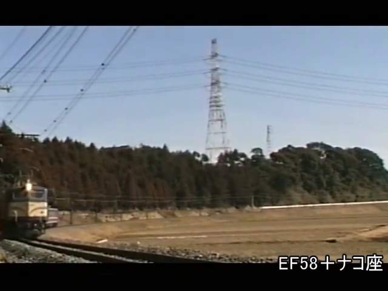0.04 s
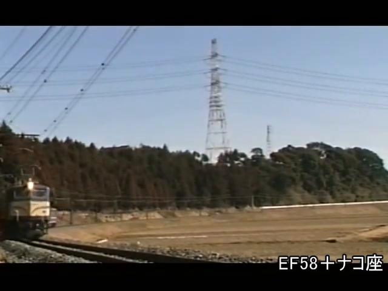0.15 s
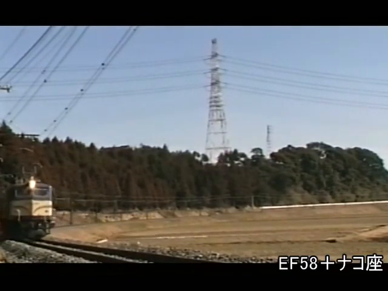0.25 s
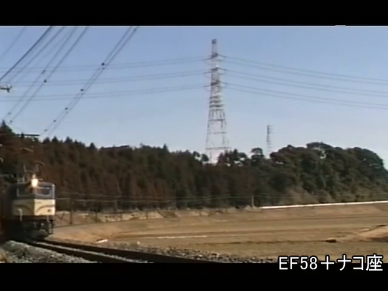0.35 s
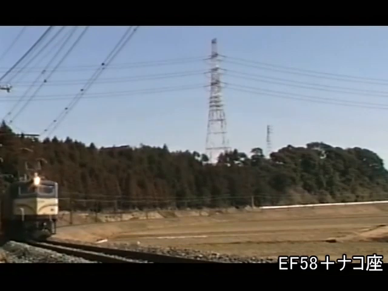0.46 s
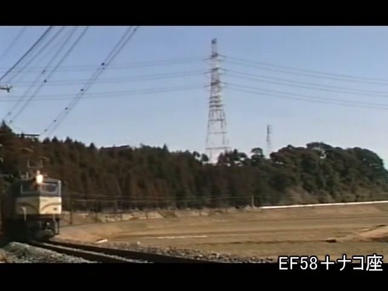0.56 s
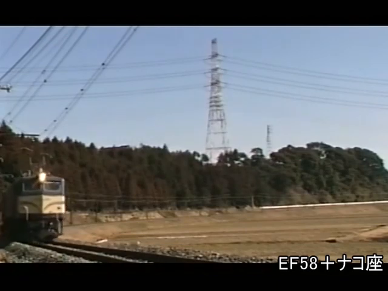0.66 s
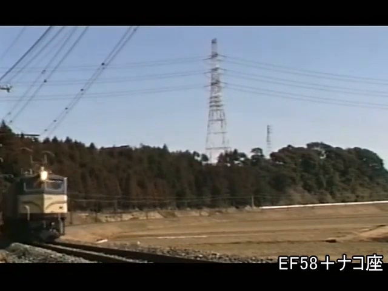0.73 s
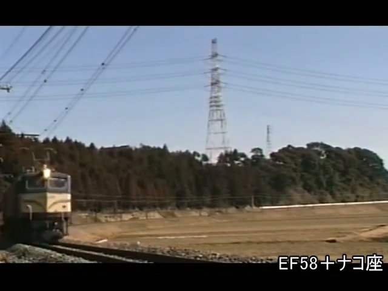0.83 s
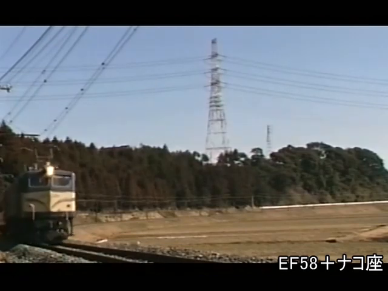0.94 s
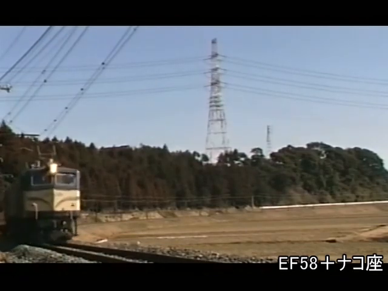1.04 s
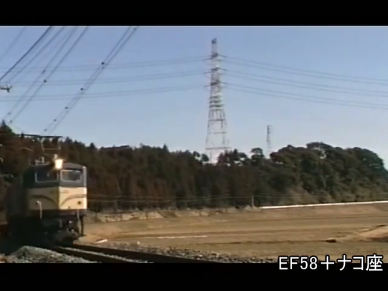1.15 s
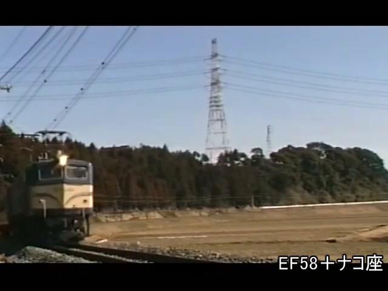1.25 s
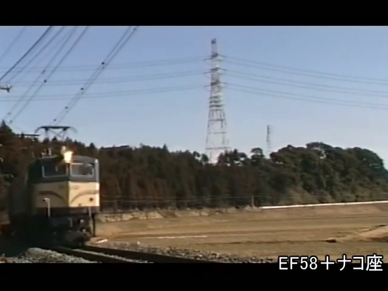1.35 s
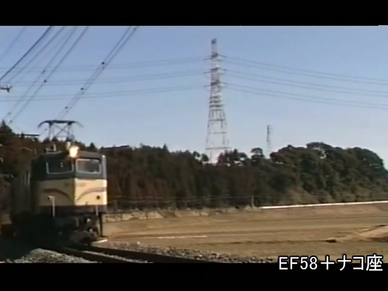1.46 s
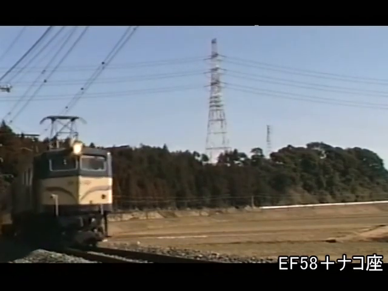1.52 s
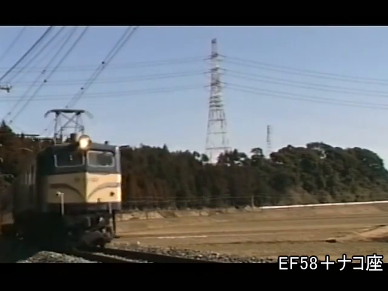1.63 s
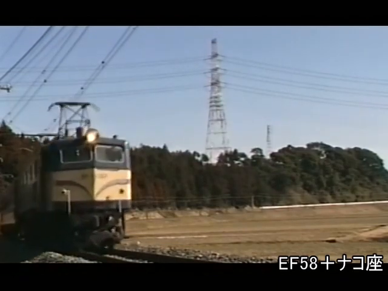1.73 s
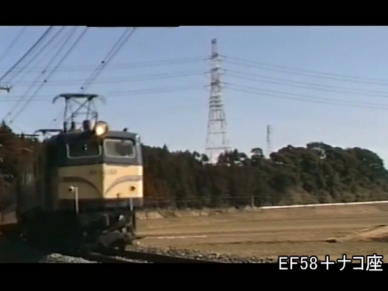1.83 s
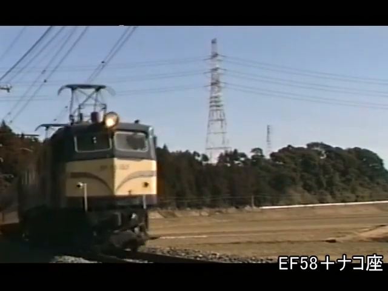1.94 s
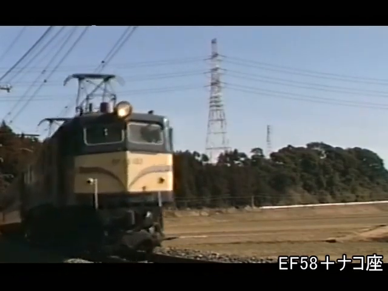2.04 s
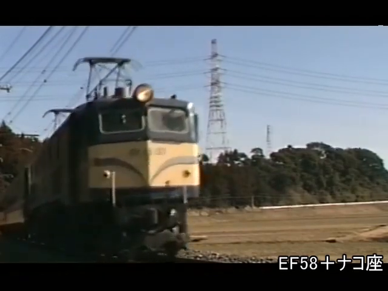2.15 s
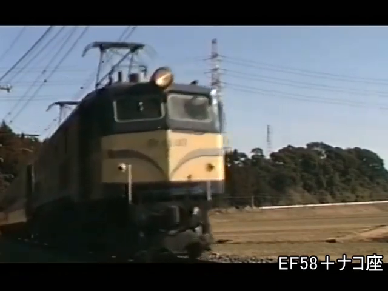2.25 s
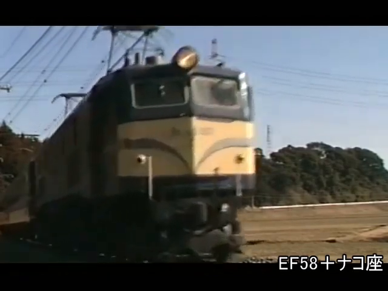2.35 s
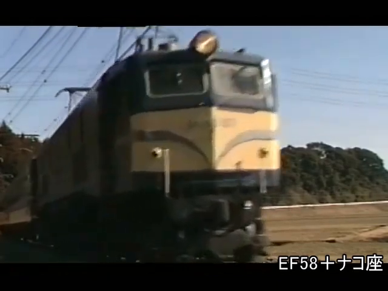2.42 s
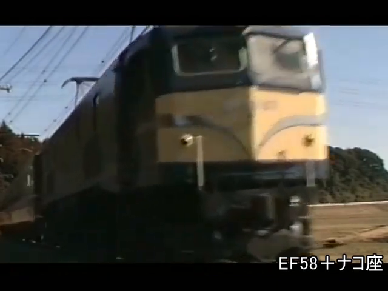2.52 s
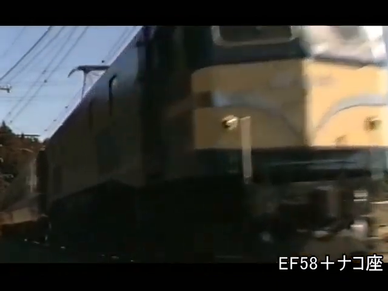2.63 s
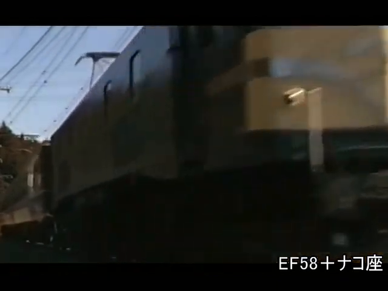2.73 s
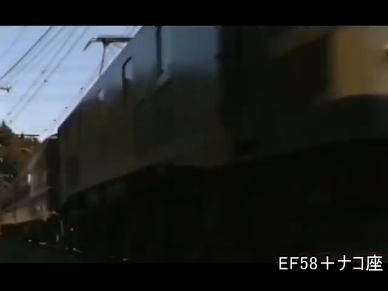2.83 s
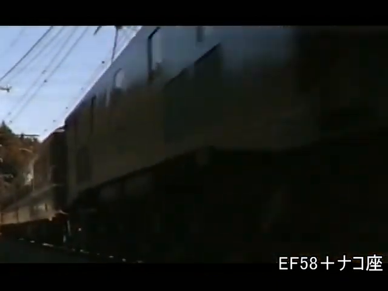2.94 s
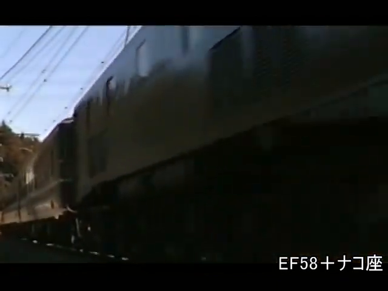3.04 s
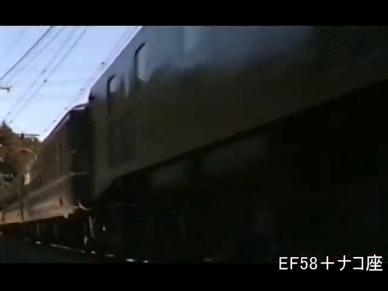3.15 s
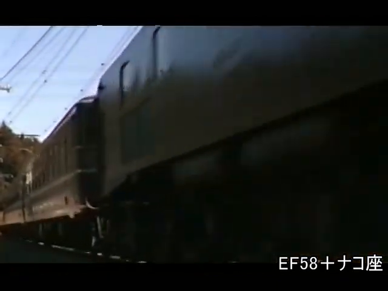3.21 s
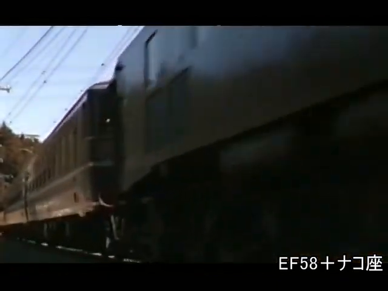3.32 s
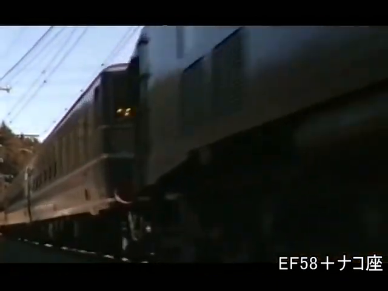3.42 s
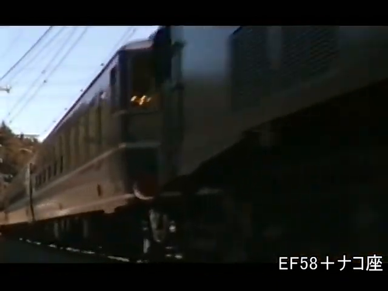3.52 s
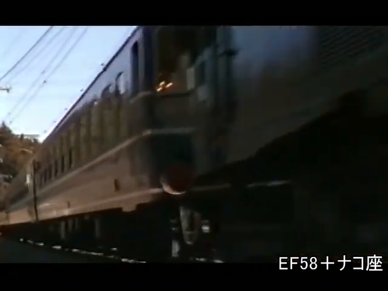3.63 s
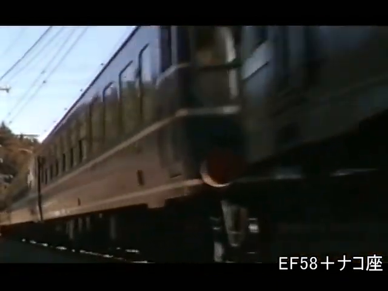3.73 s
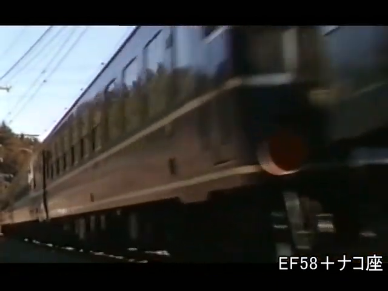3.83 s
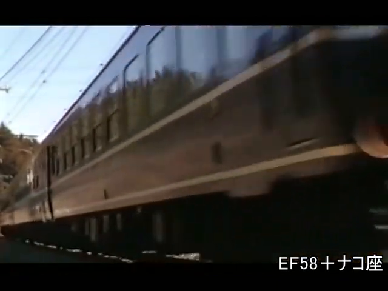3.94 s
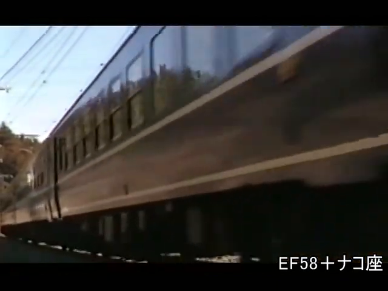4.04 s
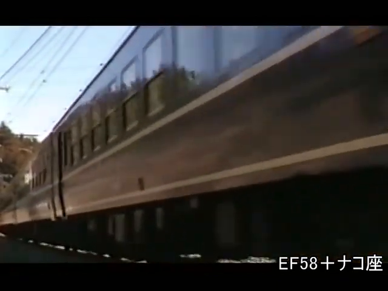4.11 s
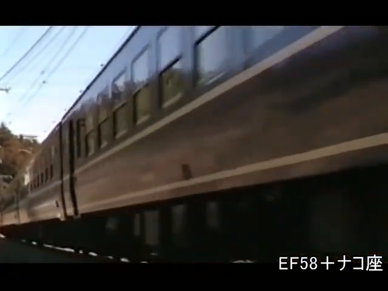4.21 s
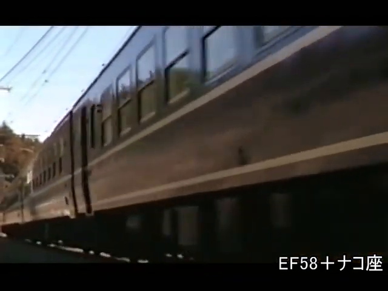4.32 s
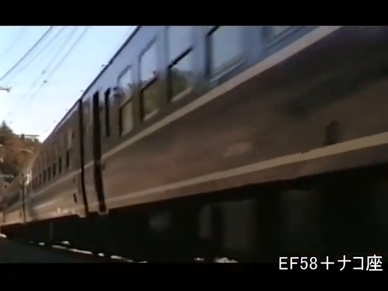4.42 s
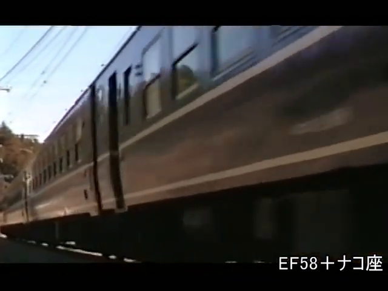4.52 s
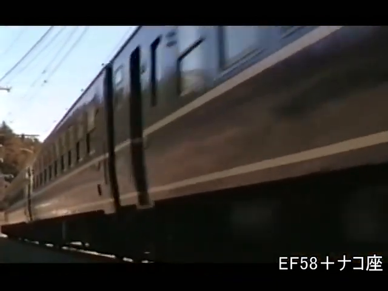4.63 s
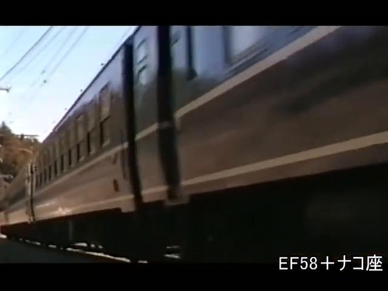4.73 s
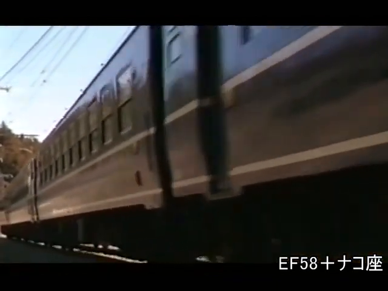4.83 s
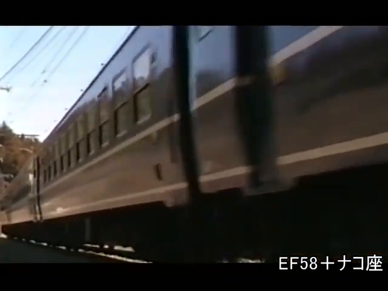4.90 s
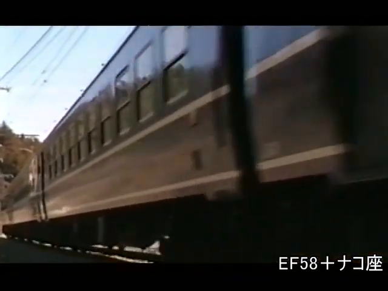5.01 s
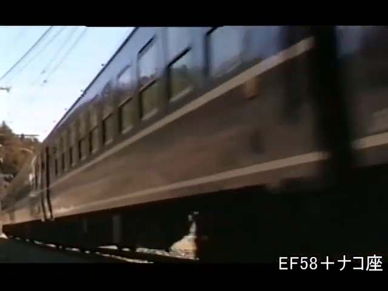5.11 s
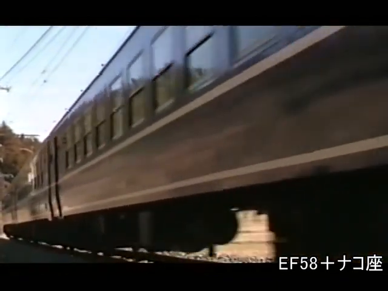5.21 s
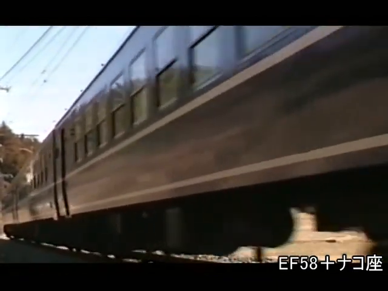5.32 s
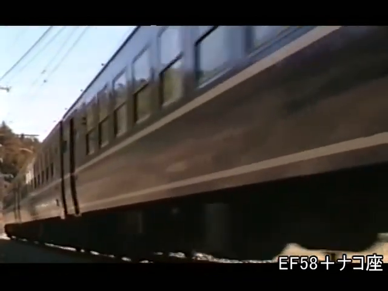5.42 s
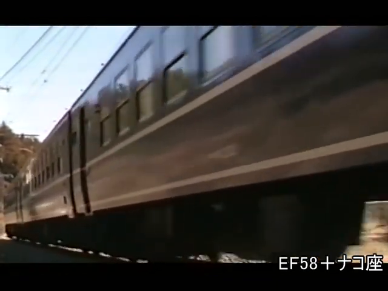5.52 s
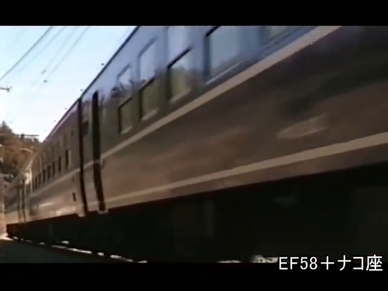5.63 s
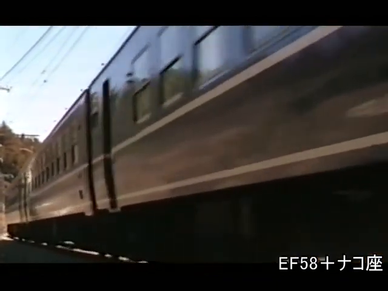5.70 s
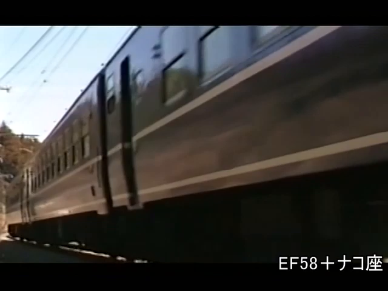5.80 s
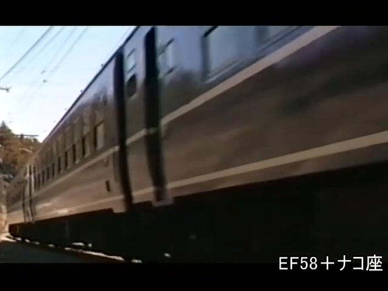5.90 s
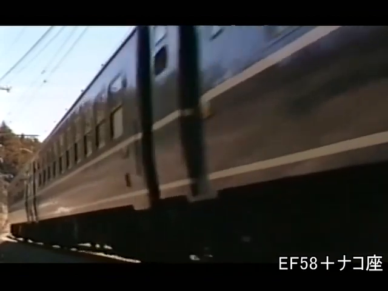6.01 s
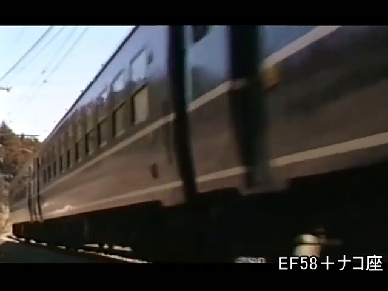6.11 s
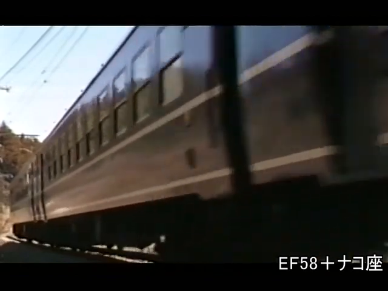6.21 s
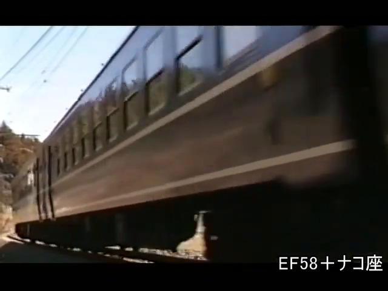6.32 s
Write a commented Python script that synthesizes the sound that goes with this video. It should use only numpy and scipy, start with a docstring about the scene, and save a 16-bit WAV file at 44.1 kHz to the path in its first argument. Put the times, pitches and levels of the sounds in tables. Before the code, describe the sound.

An electric locomotive and coaches approach through gusty wind and roar close past, wheels clacking over rail joints.

```python
"""An electric locomotive and its coaches pass a stereo microphone beside jointed track in open country.
First, gusts buffet the two ports while the train nears behind trees. Rough wheels shake sleepers, rail
and wheel discs; each axle knocks at the joints, and some blows run along the rail as a short ring.
From 2.3 s the train's draught joins the wind. Gears and blowers roar loudest near 3.3 s, then are
screened. The coaches follow: their discs sing, loose parts clatter, wheels squeal briefly."""
import sys
import numpy as np
from scipy import signal
from scipy.fft import rfft, irfft, next_fast_len
from scipy.io import wavfile
from scipy.ndimage import uniform_filter1d, map_coordinates

SR = 44100
rng = np.random.default_rng(int(sys.argv[2]) if len(sys.argv) > 2 else 0)


def put_to_file(sound):
    """Save the sound as 16-bit audio at rate SR, in the file named by the first command-line argument."""
    columns = np.atleast_2d(sound).T  # one column per channel
    safe = np.clip(columns, -1, 1)
    whole_steps = np.round(safe * 32767)
    wavfile.write(sys.argv[1], SR, whole_steps.astype(np.int16))


N = 280476
TIME_S, HZ = np.arange(N) / SR, np.maximum(np.fft.rfftfreq(next_fast_len(N), 1 / SR), 1)
CENTRE = np.zeros(N)  # no pan

# Port likeness for sound and for wind. Each row: frequency in Hz, correlation (clipped to +-1).
SOUND_LIKENESS = [(60, 0.35), (150, 0.96), (400, 0.92), (1000, 0.83), (1900, 0.68), (2700, 0.39),
                  (3800, 0.88), (5400, 0.26), (8500, 0.36)]
WIND_LIKENESS = [(30, -0.96), (150, -1.01), (300, -0.92)]
# Port directivity. Each row: frequency in Hz, pan multiplier.
PAN_SCALE = [(60, 0), (250, 0.38), (600, 0.61), (2000, 1.29), (2800, 1.74), (5000, 0.87), (9000, 0.097)]
# Bearing of the train's loudest part. Each row: time in seconds, leftward pan in dB before scaling.
TRAIN_PAN = [(0, 2), (.8, 1.5), (1.9, .5), (2.3, -1.5), (2.95, -1), (3.35, -6), (4.1, -6.5), (4.8, -5),
             (6.36, -5.5)]
# Spectra of distant rumble, wind rumble, deep buffets. Each row: frequency in Hz, relative density in dB.
FIELD_SPECTRUM = [(45, -16.5), (65, -5.5), (95, -3.5), (130, -3.5), (180, -13.5), (260, -21)]
WIND_SPECTRUM = [(24, -47), (40, -11), (93, -7), (145, 0), (324, -11), (388, -13.5), (474, -31), (500, -17),
                 (650, -51), (1100, -120)]
BUFFET_SPECTRUM = [(12, -22), (25, -3), (38, -4), (55, -17), (90, -22)]
# Gusts, and air pushed by the train. Each row: centre in seconds, length in seconds, boost in dB.
WIND_GUSTS = [(.26, 0.46, 26), (0.492, 0.23, 26.5), (0.697, 0.26, 16), (0.917, 0.15, 16), (1.5, 0.13, 7),
              (2.9, 0.26, 19), (6.023, 0.33, 29.5), (6.22, 0.25, 24)]
AIR_PUSHES = [(2.3, .1, 11), (2.85, 0.57, 3), (3.62, 0.52, 10), (6.2, .6, 4), (4.45, .2, 1)]
# Resonances. Each row: frequency in Hz, width in Hz, gain in dB. All but the tick's are applied squared.
GEAR_MODES = [(339, 66, -3), (387, 42, -2), (652, 41, -3), (1178, 27, 1.5), (1244, 500, -2)]
BLOWER_MODES = [(312, 66, -3), (1617, 550, 0), (1773, 49, -2), (1878, 52, -1.5), (2050, 43, -2.5),
                (2064, 360, -1.5)]
DISC_MODES = [(460, 45, -5), (810, 50, -3), (1160, 40, -3), (1890, 80, -5), (2030, 45, -4), (2440, 50, -5),
              (2560, 70, -7), (2620, 60, -7), (3160, 80, -8), (3290, 75, -7), (3860, 55, -7),
              (4120, 50, -7), (4640, 55, -8.5), (5500, 55, -11), (3380, 50, -8)]
JOINT_TICK_MODES = [(6430, 740, 13), (8230, 740, 4), (8900, 500, -1), (9800, 600, -6)]
# Swells of single modes. Each row: centre in seconds, length in seconds, mode index, boost in dB.
GEAR_SWELLS = [(1.49, .08, 3, 6), (1.52, .16, 0, 8), (1.59, .04, 0, 6), (1.64, .08, 3, 8),
               (1.72, .05, 1, 9), (1.99, .08, 1, 5), (2.12, .1, 3, 5), (2.37, .08, 0, 6),
               (2.475, .03, 0, 8), (2.52, .07, 3, 9), (2.83, .09, 1, 6), (2.99, .08, 1, 7),
               (3.26, .08, 0, 5), (3.36, .08, 0, 6), (3.67, .1, 0, 6), (3.32, .08, 2, 7), (3.65, .08, 2, 8),
               (3.78, .14, 2, 8), (3.98, .14, 2, 7), (4.0, .2, 0, 6)]
DISC_SWELLS = [(4.44, .1, 7, 11), (5.1, .1, 8, 6), (5.13, .08, 5, 5), (5.13, .12, 12, 14),
               (5.03, .04, 8, 4), (5.34, .12, 14, 11), (5.42, .1, 9, 7), (5.5, .14, 9, 4), (5.1, .1, 10, 6),
               (5.44, .1, 10, 6), (5.4, .1, 11, 6), (5.69, .08, 8, 6), (5.6, .1, 11, 7), (5.6, .12, 13, 7),
               (5.44, .16, 4, 5), (5.46, .06, 0, 7), (5.58, .18, 10, 8), (5.4, .12, 7, 5),
               (5.62, .14, 6, 5), (5.62, .14, 12, 8), (5.6, .16, 8, 5), (5.92, .1, 11, 7),
               (6.15, .12, 5, 6), (6.25, .1, 3, 6)]
# Short tones. Each row: start in seconds, peak in dB before panning, starting frequency in Hz.
GEAR_GROANS = [(1.97, -35, 377.5), (2.8, -20, 378.4), (3.23, -26.5, 344), (3.63, -26, 347), (3.9, -26, 652)]
WHEEL_SQUEALS = [(4.4, -30, 2620), (5.095, -25, 2450), (5.3, -34, 3380), (5.4, -33, 3290),
                 (5.56, -31, 2560), (5.6, -37, 3860)]
SLEEPER_THUDS = [(.29, -38, 158), (.487, -35.5, 178), (1.019, -30.5, 280), (1.024, -35, 151),
                 (2.3, -20.5, 164), (2.312, -20, 199), (2.318, -22, 332), (2.33, -26, 230),
                 (2.405, -20.5, 242), (2.42, -21.5, 330), (2.44, -29, 202), (2.525, -28, 211),
                 (2.607, -18.5, 310), (2.76, -34.5, 129), (2.865, -21, 202), (4.434, -30, 246),
                 (4.549, -23, 271), (4.6, -21, 480), (4.695, -25, 560), (4.869, -30, 370), (4.9, -22, 645),
                 (5.241, -22.5, 242), (5.355, -20, 272), (5.493, -25, 167), (5.606, -24.5, 230),
                 (5.752, -28, 187), (5.891, -18, 318), (6.009, -23, 297), (6.318, -22, 273)]
RAIL_RINGS = [(0.944, -21.5, 1060), (2.281, -16, 903), (2.311, -16.5, 1870), (2.308, -26, 690),
              (2.334, -20, 1220), (2.386, -23, 890), (2.43, -19, 860), (2.489, -20, 1270),
              (2.505, -19, 1166), (2.522, -26, 717), (2.528, -16, 1170), (4.694, -25.5, 1100),
              (4.977, -13.5, 838), (5.453, -21, 820), (5.54, -21, 815), (5.594, -15.5, 1146),
              (5.607, -20, 796), (5.79, -20, 783), (5.893, -21, 670), (5.979, -24, 840), (6.076, -20, 854),
              (6.187, -16.5, 850), (6.198, -26, 700)]
# Rolling spectra. Each row: frequency in Hz, relative density in dB.
SLEEPER_SPECTRUM = [(41, -45), (70, -12.5), (102, -13), (182, -3), (252, -4.5), (372, -2.5), (417, -9.5),
                    (560, -5.5), (730, -17.5), (1230, -120)]
RAIL_SPECTRUM = [(260, -30.5), (450, -9), (741, -3), (815, -4), (1000, -3), (1170, -1.5), (1470, -4),
                 (1900, -2.5), (2300, -10), (2990, -17.5), (5060, -120)]
WHEEL_SPECTRUM = [(1240, -48.5), (2100, -10.5), (2250, -7.5), (2550, -8), (2830, -6.5), (3250, -8),
                  (4800, -9), (6300, -16.5), (8190, -30), (13900, -120)]
HISS_SPECTRUM = [(3350, -11.5), (5700, 0.5), (9820, -11.5), (10400, -30), (13500, -57), (22000, -120)]
# Base rolling levels. Each row: time in seconds, rail in dB, sleepers and wheels in dB over the rail.
ROLL_LEVELS = [(0, -44.5, -10, -5), (.62, -43, -7.5, -5), (.87, -40.5, -13, -4), (.96, -36.5, -17, -3.5),
               (1.12, -45, -5, 2), (1.6, -39, -11.5, -2), (1.8, -38, -14, -1), (2.0, -34.5, -13.5, -2),
               (2.2, -33, -14, -3), (2.37, -33, -21, -0.5), (2.42, -27, -9, -5.5), (2.475, -29, -17, -3),
               (2.62, -22, -12, -6.5), (2.9, -18.5, -10.5, -4), (3.05, -19.5, -13, -3),
               (3.2, -21.5, -16.5, -2), (3.4, -25, -16, 1.5), (3.65, -25, -18, 1.5), (3.92, -25.5, -13, -1),
               (4.09, -29, -12.5, -4), (4.3, -28, -8.5, -4.5), (4.55, -29, -6.5, -3),
               (4.64, -29.5, -13, -5), (4.74, -30, -10.5, -1.5), (4.82, -28, -11, -3),
               (5.1, -28.5, -12.5, 0), (5.28, -25.5, -10, 0), (5.5, -23.5, -13.5, 1.5),
               (5.7, -25.5, -5, 0.5), (5.85, -29, -10.5, 0), (5.93, -26, -13, -1), (6.1, -25, -10.5, -0.5),
               (6.36, -29.5, -7, 4.5)]
# Axles on joints. Each row: start in seconds, low rail band in dB, upper band and treble in dB over it.
AXLE_KNOCKS = [(1.019, -32.5, 4.5, -3.5), (1.118, -36, 5, 0.5), (1.22, -38, 4, -4), (1.352, -44.5, 6, -8),
               (1.476, -44, 8, -1), (1.705, -40, 7, -12), (1.975, -43, 9, -3), (2.282, -26, 4.5, -7),
               (2.308, -23.5, 1, -2.5), (2.326, -40, -7, -10), (2.381, -33.5, 8.5, -2),
               (2.409, -23, -2.5, -6.5), (2.433, -39.5, -2, -13), (2.487, -27, -1, -9),
               (2.514, -22.5, 0, -3.5), (2.612, -27, -16, -14), (2.753, -29.5, 1, -6),
               (2.81, -26.5, -4, -9), (4.1, -31, 5, -7), (4.424, -30, -1, -4), (4.481, -28, -11, -16),
               (4.577, -28.5, 1, -9), (4.659, -32.5, 2, -9), (4.681, -24.5, -4, -5.5),
               (4.791, -41.5, 11.5, 0), (4.867, -24.5, -0.5, -7), (4.953, -31, 7, 3), (5.263, -30, -14, -3),
               (5.438, -27, -13, -12), (5.489, -23.5, -11, -15), (5.583, -23.5, -10, -3),
               (5.676, -29.5, -3, -18), (5.76, -30, -9, -6), (5.782, -26, -3, -10), (5.808, -35, 1, -12),
               (5.887, -23, -7.5, -3), (5.977, -30.5, -1, -11), (6.071, -24, -8, -6),
               (6.11, -36.5, -12, -4), (6.186, -26, -1, -20), (6.208, -40, 1, -11), (6.239, -43, 10, -11),
               (6.308, -27.5, -3, 0)]
# Bright ticks at the nearest joint. Each row: time in seconds, level in dB.
JOINT_TICKS = [(2.279, -41), (2.311, -43), (2.409, -43), (2.513, -40.5), (4.097, -46), (4.3645, -41),
               (4.466, -40), (4.571, -34), (4.668, -34), (4.856, -30.5), (4.9574, -34), (4.973, -37),
               (5.568, -38), (5.667, -37), (5.78, -33.5), (5.8596, -34.5), (5.974, -35.5), (6.065, -30.5),
               (6.177, -32.5)]

COACHES_S, COACHES_FADE_S = 3.7, .4
BOGIES_S, BOGIES_LENGTH_S = 5.5, .4  # two bogies go by
RING_PAN_DB, STUMBLE_RAD = -8.5, .5


def undb(db):
    """dB to gain."""
    return 10 ** (np.asarray(db) / 20)


def curves(table):
    """Columns of a timed table, per sample."""
    s, *columns = np.transpose(table)
    return [np.interp(TIME_S, s, c) for c in columns]


def step(s, fade_s):
    """Smooth rise from 0 to 1."""
    return (1 + np.tanh((TIME_S - s) / fade_s)) / 2


def bump(s, length_s):
    """Flat-topped swell from 0 to 1 and back."""
    return np.exp(-(2 * (TIME_S - s) / length_s) ** 4)


def swells(table, modes):
    """Boost in dB per mode and sample."""
    boost_db = np.zeros((len(modes), N))
    for s, length_s, mode, db in table:
        boost_db[mode] += db * bump(s, length_s)
    return boost_db


def walk(rate_hz):
    """Smooth random drift, spread near 1."""
    k = int(SR / rate_hz)
    held = np.repeat(rng.standard_normal(N // k + 1), k)
    return 1.32 * uniform_filter1d(uniform_filter1d(held, k), k)[:N]


def on_log(table, hz):
    """Interpolate over log frequency."""
    points_hz, values = np.transpose(table)
    return np.interp(np.log(hz), np.log(points_hz), values)


def spectrum(table):
    """Amplitude of a spectrum table, zero outside its ends."""
    return undb(on_log(table, HZ)) * (HZ > table[0][0]) * (HZ < table[-1][0])


def bands(table):
    """A spectrum cut into overlapping half octaves."""
    centres = np.arange(np.floor(2 * np.log2(table[0][0])), 2 * np.log2(table[-1][0]) + 1)
    return [spectrum(table) * np.clip(1 - abs(2 * np.log2(HZ) - c), 0, 1) for c in centres]


def resonances(modes, power=2):
    """Amplitude response of each mode, raised to a power."""
    return [(undb(db) / np.hypot(1, (HZ - hz ** 2 / HZ) / width_hz)) ** power
            for hz, width_hz, db in modes]


def noise(parts, pan_db, flicker_db, rate_hz, swell_db=None, likeness=SOUND_LIKENESS):
    """Stereo noise; each spectral part flickers alone and is panned by its pitch."""
    a, b = rfft(rng.standard_normal((2, next_fast_len(N))))
    like = np.clip(on_log(likeness, HZ), -1, 1)
    white, out = np.array([a, like * a + np.sqrt(1 - like ** 2) * b]), 0
    for k, part in enumerate(parts):
        db = flicker_db * walk(rate_hz) + (0 if swell_db is None else swell_db[k])
        side_db = on_log(PAN_SCALE, HZ[np.argmax(part)]) * np.array([pan_db, -pan_db]) / 2
        out = out + irfft(white * part)[:, :N] * undb(db + side_db)
    return out / np.sqrt(np.mean(sum(parts) ** 2))


def bursts(starts_s, db, pan_db, rises_s, t60_s):
    """Stereo envelope of blows: rounded rise, exponential fall."""
    out = np.zeros(N)
    for start, gain, rise_s in zip((starts_s * SR).astype(int), undb(db), rises_s + 0 * starts_s):
        t = TIME_S[:min(int((t60_s + 2 * rise_s) * SR), N - start)]
        attack = 1 - np.exp(-(t / rise_s) ** 2)
        shape = attack / (1 + np.exp(np.log(1000) * ((t - rise_s) / t60_s - .12)))
        out[start:start + len(t)] += gain * shape / shape.max()
    return out * undb(np.array([pan_db, -pan_db]) / 2)


def tones(rows, pan_db, cycles, glide=0, stumble_rad=STUMBLE_RAD):
    """Short tones with unsteady phase; each peaks after about `cycles` periods, then dies."""
    out, stumble = np.zeros(N), stumble_rad * walk(350)
    for (s, db, hz), turn in zip(rows, rng.random(len(rows))):
        start = int(s * SR)
        span = slice(start, start + int(8 * cycles / hz * SR))
        age = np.maximum(TIME_S[span] - s, 0) * hz / cycles
        phase = 2 * np.pi * (cycles * age * (1 + glide * age) + turn) + stumble[span]
        out[span] += undb(db) * age ** 1.6 * np.exp(1 - age ** 1.63) * np.sin(phase)
    return out * undb(np.array([[pan_db], [-pan_db]]) / 2)


def waver(sound, lead_s=0, jitter_s=.0006):
    """An unsteady sound path makes the pitch waver."""
    read_s = TIME_S + lead_s + jitter_s * walk(12)
    return np.array([map_coordinates(port, [read_s * SR], mode="nearest") for port in sound])


def fields():
    """Distant rumble of open country."""
    return undb(-54) * noise(bands(FIELD_SPECTRUM), CENTRE, 2.2, 8.4)


def wind():
    """Gusts and the train's draught push the ports against each other, harder on the left."""
    draught, side = step(2.3, .2), np.array([[1], [-1]])
    gust_db = np.max([db * bump(s, length_s) for s, length_s, db in WIND_GUSTS], axis=0)
    push_db = sum(db * bump(s, length_s) for s, length_s, db in AIR_PUSHES)
    rumble_db = -60 + 2 * draught + gust_db + .91 * side + 2 * walk(25)
    buffet_db = -65 + 12.5 * draught + push_db + 4.2 * side
    return (undb(rumble_db) * noise(bands(WIND_SPECTRUM), CENTRE, 3.5, 21, likeness=WIND_LIKENESS)
            + undb(buffet_db) * noise(bands(BUFFET_SPECTRUM), CENTRE, 1.7, 11, likeness=WIND_LIKENESS))


def clatter(rail_db, start_s=4.3, rate_hz=70, low_hz=550, high_hz=1300):
    """Brake gear and couplings knock at random under the coaches."""
    gap, size, pitch = rng.random((3, 500))
    s = start_s + np.cumsum(-np.log(1 - gap)) / rate_hz
    keep = s < N / SR
    db = rail_db[(s[keep] * SR).astype(int)] - 8 + 8 * size[keep]
    hz = low_hz * (high_hz / low_hz) ** pitch[keep]
    return tones(np.transpose([s[keep], db, hz]), RING_PAN_DB, cycles=1.7)


def squeals():
    """A wheel squeals briefly on one pitch."""
    return tones(WHEEL_SQUEALS, RING_PAN_DB, cycles=80, glide=-.0023, stumble_rad=1)


def discs(pan_db, wheels_db, doppler_s=.2):
    """Wheel discs ring in narrow modes, mainly on the coaches; the pitch falls as the bogies pass."""
    swell_db = swells(DISC_SWELLS, DISC_MODES) - 1.5 * bump(BOGIES_S, BOGIES_LENGTH_S)
    ring = noise(resonances(DISC_MODES), pan_db, 3.34, 22, swell_db)
    lead_s = .015 * doppler_s * np.exp(-((TIME_S - BOGIES_S) / doppler_s) ** 2 / 2)
    return undb(wheels_db - 16 + 12.5 * step(COACHES_S, COACHES_FADE_S)) * waver(ring, lead_s)


def machinery(pan_db):
    """Gears and blowers, loudest abreast; screened by trees at first, and again once gone by."""
    screen_db = -14 * (1 - step(.87, .4)) - 28 * step(4.3, .13)
    swell_db = swells(GEAR_SWELLS, GEAR_MODES)
    swell_db[[1, 3]] -= 7 * step(3.2, .1)  # the whine points ahead
    gear_gain = undb(screen_db - 26) / np.hypot(1, (TIME_S - 3.32) / .38)
    gears = waver(gear_gain * noise(resonances(GEAR_MODES), pan_db, 2.1, 20, swell_db))
    groans = tones(GEAR_GROANS, pan_db=-2, cycles=12.2, glide=-.008)
    away_s = np.maximum(abs(TIME_S - 3.355) - .32, 0)  # louvres run all along the side
    blower_gain = undb(screen_db - 21) / np.hypot(1, away_s / .2)
    return gears + groans + blower_gain * noise(resonances(BLOWER_MODES), pan_db, .27, 21)


def rolling(pan_db, sleepers_db, rail_db, wheels_db):
    """Roughness drives sleepers (bass), rail (middle) and wheels (top); all shudder together."""
    approach = 1 - step(3.1, .6)
    hiss_db = wheels_db - 12.5 + 1.5 * approach + bump(BOGIES_S, BOGIES_LENGTH_S)
    roar_db = wheels_db - 3.5 * step(COACHES_S, COACHES_FADE_S)
    shudder = undb(.55 * walk(18))
    return shudder * (undb(sleepers_db) * noise(bands(SLEEPER_SPECTRUM), pan_db, 2.5, 14)
                      + undb(rail_db) * noise(bands(RAIL_SPECTRUM), pan_db, .66, 14)
                      + undb(roar_db) * noise(bands(WHEEL_SPECTRUM), pan_db, .39, 14)
                      + undb(hiss_db) * noise(bands(HISS_SPECTRUM), pan_db, .36, 14))


def ticks(lead_s=.003):
    """The nearest joint ticks brightly just ahead of the blow."""
    s, db = np.transpose(JOINT_TICKS)
    envelope = bursts(s - lead_s, db, CENTRE - 2, rises_s=.006, t60_s=.07)
    return envelope * noise([sum(resonances(JOINT_TICK_MODES, power=1)) * (HZ > 4500)], CENTRE, 2.9, 220)


def rail_rings():
    """Blows run along the rail; a weaker, higher partial beats with each ring."""
    partials = [(s, db - 5, 1.2 * hz) for s, db, hz in RAIL_RINGS]
    ring = tones(RAIL_RINGS, RING_PAN_DB, cycles=5.6, glide=.0042)
    return ring + tones(partials, RING_PAN_DB, cycles=2.7)


def joints(pan_db, loco_rise_s=.0032, coach_rise_s=.008):
    """Axles drop over rail gaps and strike sleepers, rail and wheel; coach axles land more softly."""
    s, db, upper_db, treble_db = np.transpose(AXLE_KNOCKS)
    rises_s = np.where(s > COACHES_S, coach_rise_s, loco_rise_s)
    starts_s = s - (rises_s - loco_rise_s)

    def knock(over_db, pan_scale=1.26, t60_s=.13):
        return bursts(starts_s, db + over_db, pan_scale * pan_db, rises_s, t60_s)

    upper = np.clip(2 * np.log2(HZ / 1000), 0, 1)
    body = knock(-5.5, pan_scale=.39) * noise([spectrum(SLEEPER_SPECTRUM)], CENTRE, .95, 40.35)
    clank = knock(0) * noise([spectrum(RAIL_SPECTRUM) * (1 - upper)], CENTRE, 2.2, 90)
    clang = knock(upper_db) * noise([spectrum(RAIL_SPECTRUM) * upper], CENTRE, .81, 90)
    treble = knock(treble_db) * noise([spectrum(WHEEL_SPECTRUM)], CENTRE, 3.4, 90)
    impact = body + clank + clang + treble + ticks()
    thuds = tones(SLEEPER_THUDS, pan_db=2, cycles=1.4, glide=-.0053, stumble_rad=0)
    rings = rail_rings()
    disc_ring = noise([sum(resonances(DISC_MODES))], CENTRE, 1.2, 40)
    return impact + thuds + rings + knock(upper_db - 14, pan_scale=.75, t60_s=.16) * disc_ring


def ports(train, pan_db, lag_s_per_db=9e-6, turn_rad_per_db=.09):
    """Shift the left channel in phase and time, so the farther port hears the train later."""
    left, right = train
    pan_db = uniform_filter1d(pan_db, SR // 2)
    left = (signal.hilbert(left, next_fast_len(N))[:N] * np.exp(1j * turn_rad_per_db * pan_db)).real
    left = map_coordinates(left, [(TIME_S + lag_s_per_db * pan_db) * SR], order=3, mode="nearest")
    return np.array([left, right])


def scene():
    """The passing train over wind and distant rumble."""
    rail_db, sleepers_over_db, wheels_over_db = curves(ROLL_LEVELS)
    wheels_db = rail_db + wheels_over_db
    pan_db, = curves(TRAIN_PAN)
    train = rolling(pan_db, rail_db + sleepers_over_db, rail_db, wheels_db)
    train += machinery(pan_db) + discs(pan_db, wheels_db) + joints(pan_db) + clatter(rail_db) + squeals()
    return ports(train, pan_db) + wind() + fields()


def record(dry):
    """Soft clipping, then a steep low-pass at 10.5 kHz."""
    lowpass = signal.ellip(10, .2, 70, 10500, fs=SR, output="sos")
    return signal.sosfilt(lowpass, .88 * np.tanh(dry / .94))


dry = scene()
out = record(dry)
put_to_file(out)
```